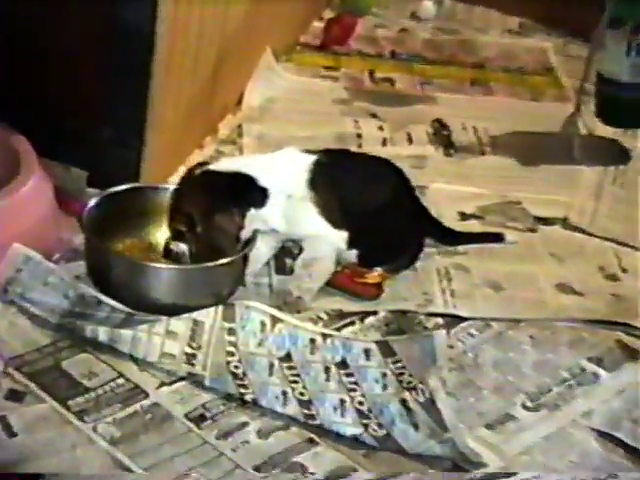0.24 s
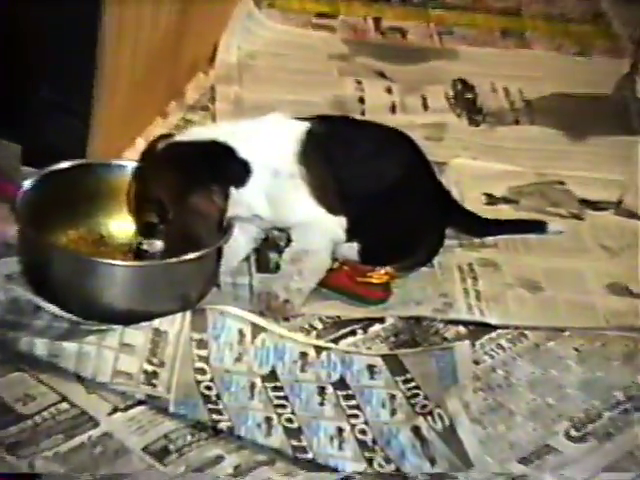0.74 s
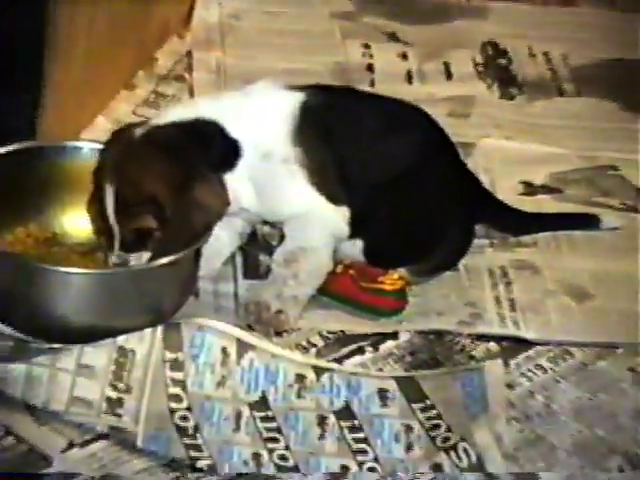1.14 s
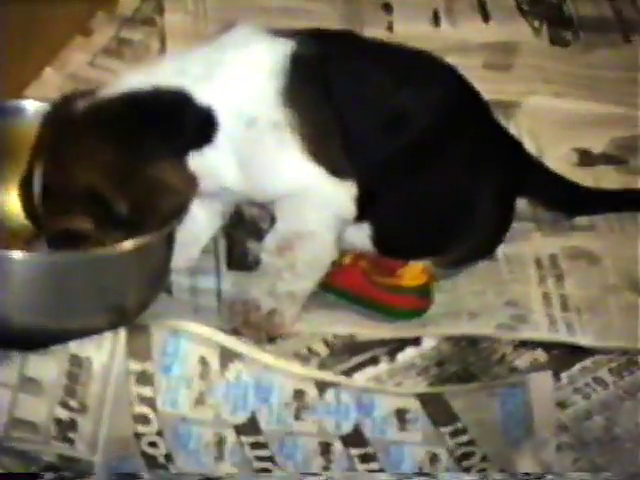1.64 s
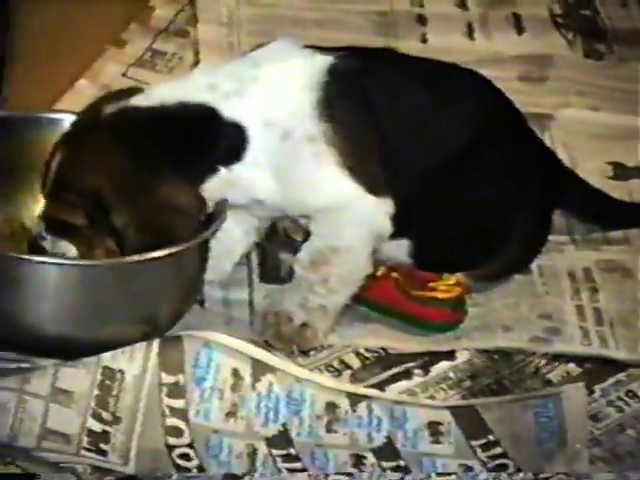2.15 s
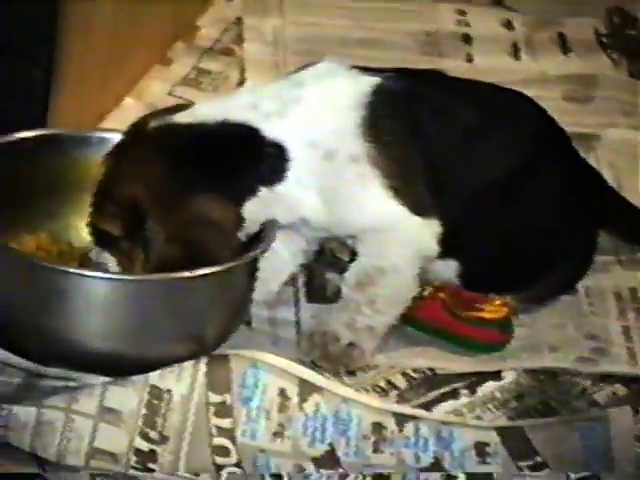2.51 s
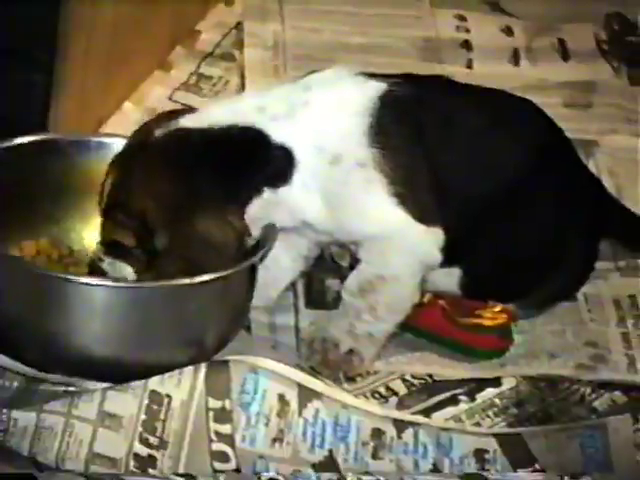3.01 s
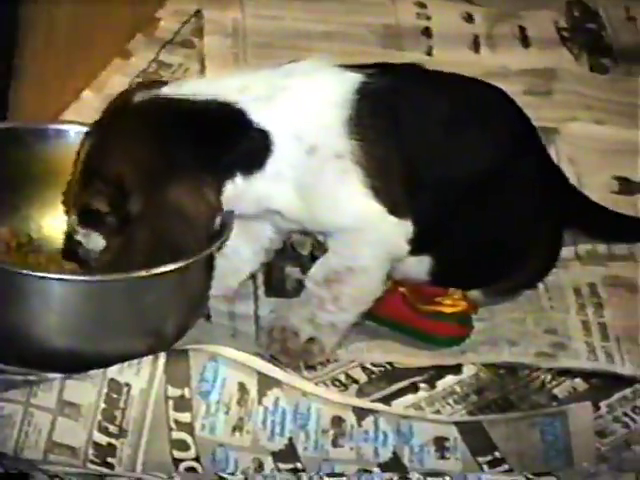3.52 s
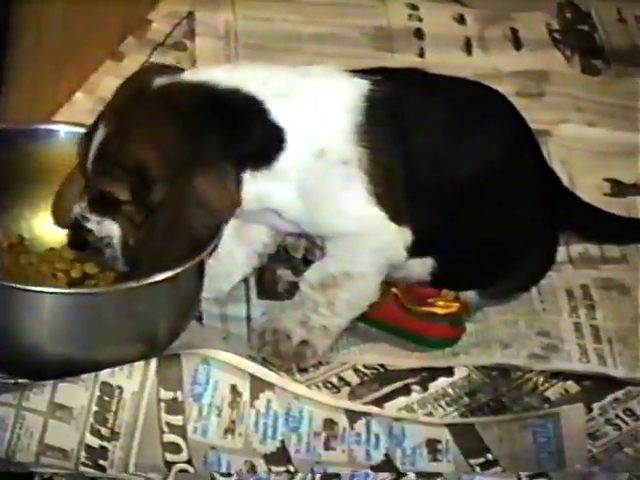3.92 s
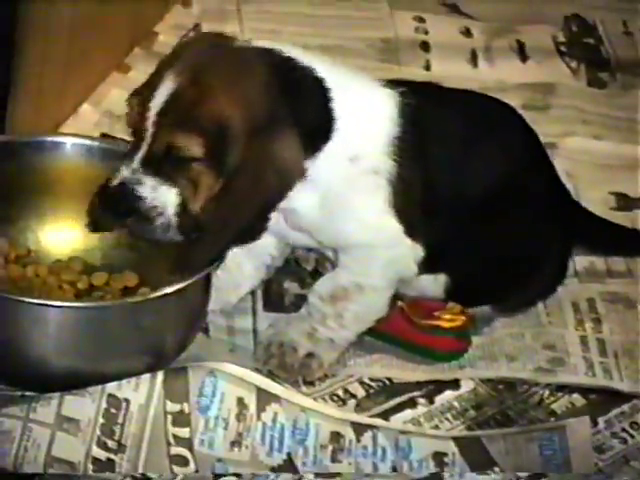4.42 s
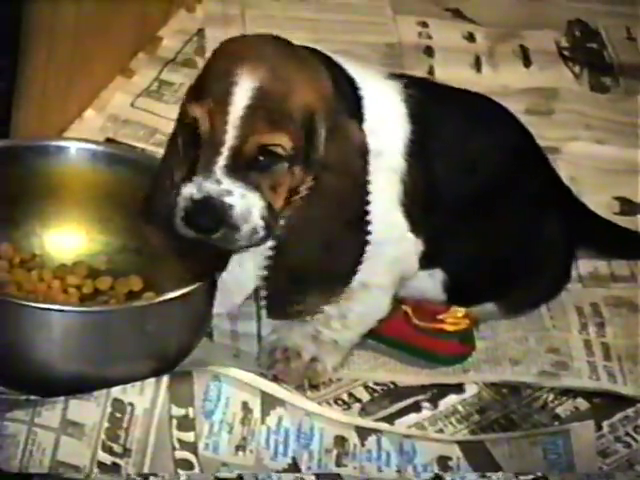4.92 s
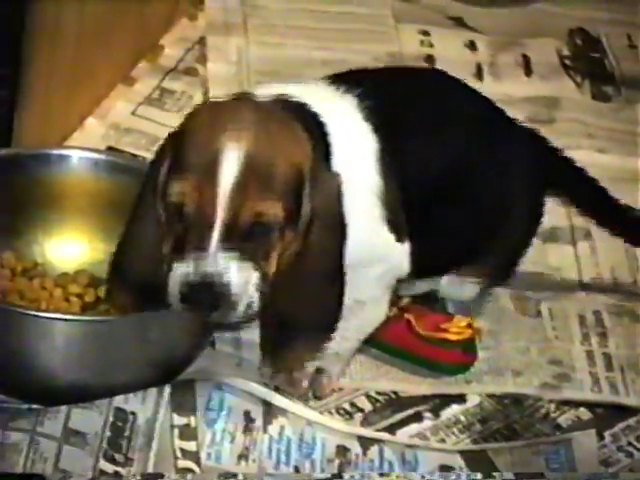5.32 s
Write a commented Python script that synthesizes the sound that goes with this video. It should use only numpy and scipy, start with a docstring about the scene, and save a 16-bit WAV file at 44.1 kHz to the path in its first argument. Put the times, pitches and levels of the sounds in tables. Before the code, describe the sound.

Puppies whimper and squeak indoors, one crying loudly again and again, with a brief newspaper rustle and steady hiss.

```python
"""A litter of puppies whines in a small hard-walled room, over house rumble, motor hum, tape hiss and buzz.
Faint whimpers come first, then a pup whose cries sink in pitch, and thin squeaks through the nose.
At 1 s a loud pup joins with almost pure tones that fall at their ends; the room rings after each cry.
From 2 s paws rustle on newspaper, and soon the loud cries close with a low croak. The camera's gain
control turns the rumble down along with the loud cries, while the hiss and buzz stay steady."""
import sys
import numpy as np
from scipy import signal
from scipy.fft import rfft, irfft, next_fast_len
from scipy.io import wavfile
from scipy.ndimage import uniform_filter1d

SR = 44100
rng = np.random.default_rng(int(sys.argv[2]) if len(sys.argv) > 2 else 0)


def waveform_to_disk(signal):
    """Save audio, clipped to [-1, 1], as 16-bit WAV at the path in sys.argv[1]."""
    frames = np.transpose(np.atleast_2d(signal))
    scaled = np.clip(frames, -1, 1) * 32767
    samples = np.round(scaled).astype(np.int16)
    wavfile.write(sys.argv[1], SR, samples)


N = 244973

# Levels are before the gain control. Harmonic k is a tone at k times the pitch; the 1st is the main tone.
# tone colour of the house rumble: f/Hz, relative level/dB
RUMBLE_COLOUR = [(15, -64), (25, -28.5), (113, -3.5), (421, -3), (567, -2), (644, -8.5), (763, -7),
                 (814, -5), (1190, -3.5), (1330, -6), (4000, -39), (5200, -80), (8800, -120)]
# level of the low hum over time: t/s, level/dB
HUM_LEVELS = [(0.0, -68), (1.3, -59.5), (2.1, -55.5), (2.5, -71), (2.7, -55.5), (3.85, -53.5), (4.0, -67.5),
              (4.2, -57), (4.9, -61), (5.55, -57)]
# tone colour of the tape hiss: f/Hz, relative level/dB
HISS_COLOUR = [(1470, -21.5), (2500, -3), (4310, -7), (4410, -5), (7780, -4), (9220, -2), (14300, -8),
               (15600, -6)]
# strength of the odd-numbered buzz tones: f/Hz, level/dB
BUZZ_LEVELS = [(3800, -76), (5000, -73), (7400, -71), (9400, -71), (11000, -73), (13000, -79), (15300, -79)]
# short whimpers: t/s, length/s, first f/Hz, last f/Hz, level/dB
WHIMPER_GLIDES = [(0.01, 0.052, 1100, 1110, -45), (0.225, 0.059, 558, 555, -40),
                  (0.286, 0.052, 1430, 1280, -45.5), (0.668, 0.035, 1417, 964, -36.5),
                  (1.37, 0.028, 1465, 1475, -41.5), (2.925, 0.17, 596, 549, -35.5),
                  (3.097, 0.098, 717, 646, -38), (3.778, 0.035, 1176, 1150, -34.5),
                  (3.821, 0.045, 1113, 962, -21.5), (3.945, 0.042, 558, 626, -40),
                  (4.059, 0.04, 521, 537, -37.5), (4.139, 0.08, 820, 708, -39),
                  (5.149, 0.041, 976, 836, -24.5)]
# how the mouth shapes the 3rd harmonic: f/Hz, level against the main tone/dB
MOUTH_THIRD = [(1900, -16.5), (2500, -12.5), (3000, -22.5), (3500, -27), (4500, -26)]
# the same for harmonics 4 to 7: f/Hz, level against the main tone/dB
MOUTH_UPPER = [(1500, -46), (2800, -57), (3500, -34.5), (4300, -53), (5000, -55), (5800, -50.5),
               (6500, -59), (8000, -78)]
# the sinking pup's cries: t/s, lead-in/s, sink time/s, length/s, first f/Hz, turning f/Hz, low f/Hz,
# four times level/dB (start to end), first and last overtone strength/dB, 3rd harmonic boost/dB
SINKING_CRIES = [(0.26, 0.018, 0.151, 0.23, 809, 782, 754.6, -24.5, -28.5, -27.5, -21.5, -23, -24.5, -8),
                 (0.802, 0.056, 0.045, 0.13, 808, 845, 682, -29.5, -28.5, -27, -27, -25, -16.5, 1),
                 (1.232, 0.051, 0.038, 0.21, 1014, 1085, 753, -25, -23.5, -23.5, -35.5, -26.5, -37, 4),
                 (1.601, 0.042, 0.05, 0.23, 1081, 1148, 715, -19.5, -22, -24, -32, -32.5, -12.5, -1),
                 (2.121, 0.0708, 0.045, 0.155, 1122, 1079, 1022, -23.5, -28, -18.5, -12, -22, -34, 9),
                 (2.518, 0.085, 0.06, 0.27, 1075, 1113, 687.7, -35.5, -25.5, -22.5, -26.5, -19, -26, 6),
                 (3.092, 0.05, 0.091, 0.31, 852.6, 890, 705, -28.5, -26, -23.5, -26.5, -28.5, -16, -2.5),
                 (4.575, 0.016, 0.013, 0.21, 785, 777, 718, -40, -28, -30.5, -34, -15, -11, -0.5)]
# squeaks through the nose: t/s, rough peak level/dB, f/Hz
NOSE_SQUEAKS = [(0.668, -50, 5650), (0.8834, -46, 3670), (1.1816, -56, 5500), (1.34, -52, 5600),
                (1.393, -51, 5220), (1.553, -52, 5870), (1.732, -50, 3750), (1.94, -51, 6200),
                (2.106, -53, 6105), (2.532, -48, 6080), (2.573, -51, 5780), (2.64, -58, 5220),
                (2.782, -47.5, 5570), (2.9248, -51.5, 5620), (3.024, -50, 6180), (3.677, -50, 5050),
                (3.7893, -38, 3370), (3.8681, -51.5, 5590), (3.926, -50, 5650), (4.52, -47, 5640),
                (4.797, -55, 5110), (5.52, -48, 5780)]
# the loud pup's cries: t/s, f/Hz, level/dB, overtone strength/dB (2nd harmonic against the main tone)
LOUD_CRIES = [
    [(0.985, 1522, -44, -35), (1.019, 1555, -34.5, -24), (1.119, 1445, -45, -43), (1.151, 1328, -37, -25),
     (1.165, 1056, -26.5, -21), (1.19, 1071, -67, -24)],
    [(1.41, 1450, -46, -18), (1.472, 1535, -36.5, -44), (1.6, 1415, -41, -14), (1.634, 1332, -25.5, -48),
     (1.65, 1157, -16.5, -43), (1.68, 924, -18, -38)],
    [(1.868, 1188, -15.5, -18), (1.884, 1246, -32, -23), (1.922, 1312, -22.5, -30),
     (1.968, 1174, -25, -14.5), (2.018, 1089, -25.5, -21.5), (2.126, 1009, -33.5, -4),
     (2.15, 998.7, -21, -19), (2.198, 994.5, -19, -18.5), (2.254, 1009, -19, -27), (2.27, 1030, -44.5, 7),
     (2.28, 959, -18, -27), (2.31, 737, -34.5, -42)],
    [(2.484, 1265, -23, -37), (2.51, 1254, -19.5, -32), (2.52, 1300, -26, -38.5), (2.528, 1424, -33, -31),
     (2.55, 1340, -29, -36), (2.625, 1320, -27.5, -27), (2.655, 1235, -31, -28), (2.67, 1158, -29.5, -23),
     (2.72, 1091, -17.5, -33), (2.75, 958, -22.5, -27), (2.768, 741, -20, -30.5), (2.785, 707, -38, -1.5)],
    [(2.945, 1148, -27, -20.5), (2.989, 1206, -21, -26), (3.001, 1257, -26.5, -27), (3.053, 1165, -19, -25),
     (3.117, 1162, -14, -28.5), (3.171, 1041, -15.5, -31), (3.199, 818, -16.5, -44.5),
     (3.215, 567, -41, -10.5)],
    [(3.413, 1205, -15, -36), (3.431, 1197, -11, -41), (3.469, 1226, -10.5, -49),
     (3.503, 1207, -11.5, -32.5), (3.513, 1187, -13, -41), (3.522, 1236, -18, -36), (3.57, 1220, -36, -10),
     (3.59, 1132, -18, -20), (3.631, 1077, -17, -25.5), (3.712, 944.4, -14, -48),
     (3.737, 750, -21.5, -31.5), (3.752, 600, -26, -20)],
    [(3.935, 1172, -20, -40), (3.945, 1213, -11, -33), (4.045, 1196, -8.5, -35), (4.062, 1110, -16.5, -42),
     (4.072, 1092, -16.5, -30), (4.099, 1066, -17.5, -48), (4.153, 1053, -15.5, -33.5),
     (4.172, 1028, -21.5, -26.5), (4.204, 1005, -14.5, -22.5), (4.288, 1026, -17, -16),
     (4.328, 1024, -9.5, -33.5), (4.338, 962, -14, -26.5), (4.363, 611, -26.5, -9.5)],
    [(4.542, 1104, -23, -32), (4.598, 1177, -16, -49.5), (4.684, 1097, -16, -34.5),
     (4.696, 1141, -13.5, -36), (4.724, 1109, -21, -31), (4.748, 1104, -9.5, -40), (4.774, 1063, -15, -25),
     (4.83, 999, -12.5, -23.5), (4.85, 848, -16, -39), (4.878, 587, -33, 12.5)],
    [(5.063, 996, -29, -15), (5.093, 1066, -15.5, -33), (5.145, 1098, -17, -28), (5.269, 1008, -14.5, -30),
     (5.298, 987, -30, -4.5), (5.31, 967, -18.5, -21), (5.35, 945, -15.5, -24),
     (5.412, 789.2, -16.5, -30.5), (5.48, 794.5, -23.5, -23), (5.5, 763, -21, -10.5),
     (5.525, 555, -37, -21.5)],
]
# for each loud cry: 3rd harmonic boost/dB
LOUD_BOOSTS = [7, 8, -1, 2.5, 3, -7, 0, -4, -3.5]
# paw steps: t/s, crackle level/dB, time to fade by 60 dB/s, thud level/dB
PAW_STEPS = [(2.149, -28, 0.019, -53), (2.461, -37.5, 0.13, -47.5), (2.51, -41, 0.58, -63),
             (3.808, -56, 0.17, -40)]
# tone colour of newspaper: f/Hz, relative level/dB
PAPER_COLOUR = [(300, -16.5), (1200, 7.5), (2500, -18.5), (4000, -11.5), (5300, -12), (6500, -22.5),
                (8000, -29.5)]
# croaks that close the falling cries: t/s, peak level/dB
CLOSING_CROAKS = [(2.772, -38), (3.205, -31), (3.742, -24), (4.355, -33), (4.868, -20.5), (5.515, -33.5)]


def from_db(db):
    """Turns a level in dB into a number to multiply by."""
    return 10 ** (np.asarray(db) / 20)


def rms_one(x):
    """Scales a sound to an average strength (rms) of 1."""
    return x / np.sqrt(np.mean(x ** 2) + 1e-20)


def at_hz(points, hz):
    """Looks up a level between a table's frequencies, on an octave scale."""
    return np.interp(np.log(hz), np.log(np.array(points)[:, 0]), np.array(points)[:, 1])


def drift(rate_hz):
    """A random wander of size about 1: noise smoothed twice."""
    r = np.exp(-2 * np.pi * rate_hz / SR)
    return rms_one(signal.lfilter([1], [1, -2 * r, r * r], rng.standard_normal(N + 9000))[9000:])


def coloured_noise(colour):
    """Noise of strength 1 with the given tone colour."""
    hz = np.maximum(np.fft.rfftfreq(N, 1 / SR), 1)
    return rms_one(irfft(rfft(rng.standard_normal(N)) * from_db(at_hz(colour, hz)), N))


def tones(pairs, scatter_turns=0.11):
    """Steady pure tones from (f/Hz, level/dB) pairs, loosely in step."""
    t = np.arange(N) / SR
    return sum(np.sqrt(2) * from_db(db) * np.sin(2 * np.pi * (hz * t + scatter_turns * rng.normal()))
               for hz, db in pairs)


def house_rumble(level_db=-44.5):
    """Broad, low noise whose level wanders a little."""
    return from_db(level_db + 2.1 * drift(5.9)) * coloured_noise(RUMBLE_COLOUR)


def motor_hum(hz=126.2):
    """A low hum and its octave, with a level that varies over time."""
    db = np.interp(np.arange(N) / SR, *np.transpose(HUM_LEVELS)) + 1.5 * drift(9.0) + 1.5 * drift(2.2)
    return from_db(db) * tones([(hz, 0), (2 * hz, -5.5)])


def tape_noise(hiss_db=-51, buzz_hz=4 * 59.94, whistle_hz=15734.3):
    """Tape hiss, buzz leaking from the picture signal, and the high line-scan whistle."""
    harmonics = np.arange(16, 64)
    hz = harmonics * buzz_hz
    db = at_hz(BUZZ_LEVELS, hz) - 4 * (harmonics % 2 == 0)   # even ones are weaker
    return from_db(hiss_db) * coloured_noise(HISS_COLOUR) + tones([*zip(hz, db), (whistle_hz, -67)])


def overtone_levels(pitch, db, strength_db, boost_db):
    """Levels of harmonics 2 to 7; the overtone strength sets the 2nd and also lifts the 3rd."""
    third = db + 0.55 * strength_db + boost_db + at_hz(MOUTH_THIRD, 3 * pitch)
    upper = [db + 0.54 * boost_db + at_hz(MOUTH_UPPER, k * pitch) for k in range(4, 8)]
    return [db + strength_db, third, *upper]


def voice(cries, shaky=1, jitter=0.0045, shimmer_db=0.6, breath_db=-22):
    """Sings rows of t/s, f/Hz, level/dB; extra strength and boost columns add hoarse overtones."""
    out = np.zeros(N)
    wobble = 1 + shaky * jitter * (drift(9.9) + drift(30.0)) / np.sqrt(2)
    tremble = from_db(shaky * shimmer_db * drift(64.0)) + from_db(breath_db) * drift(170.0)
    flicker, rasp = from_db(2.5 * drift(8.7)), drift(150.0)
    for cry in cries:
        times, hz, *columns = np.transpose(cry)
        span = np.arange(round(times[0] * SR), min(round(times[-1] * SR), N))
        t = span / SR
        pitch = np.interp(t, times, hz)
        phase = 2 * np.pi * np.cumsum(pitch * wobble[span]) / SR
        db, *extras = [np.interp(t, times, column) for column in columns]
        tone = from_db(db) * np.sin(phase) * tremble[span]
        octaves_per_s = np.gradient(uniform_filter1d(np.log2(pitch), size=400)) * SR
        hoarse = np.clip(0.3 - 0.08 * octaves_per_s, 0.3, 1)   # a falling pitch is rougher
        for k, overtone_db in enumerate(overtone_levels(pitch, db, *extras) if extras else [], 2):
            shifted = (span + 7001 * k) % N   # each overtone flickers in its own time
            roughness = np.sqrt(1 - 0.9 * hoarse ** 2) + hoarse * rasp[shifted]
            tone += from_db(overtone_db) * np.sin(k * phase) * flicker[shifted] * roughness
        fades = np.clip(np.minimum((t - t[0]) / 0.0055, (t[-1] - t) / 0.0028), 0, 1)
        out[span] += np.sqrt(2) * tone * fades
    return out


def whimpers():
    """Rows for voice(): short, straight slides in pitch at one level."""
    return [[(start, first_hz, db), (start + length, last_hz, db)]
            for start, length, first_hz, last_hz, db in WHIMPER_GLIDES]


def room(x, fade_s=0.39, echo_db=-15, wall_cut_hz=3280, ring_hz=1075, ring_db=0.1):
    """Echoes bounce between the walls, duller each time, and one note of the room rings on."""
    size = next_fast_len(N + SR)
    hz = np.fft.rfftfreq(size, 1 / SR)
    walls = 1 + 1j * hz / wall_cut_hz
    echoes = 0
    for k, lag_s in enumerate([.0113, .0149, .0177, .0211, .0243, .0289, .0317, .0361, .0409, .0453]):
        bounce = from_db(-60 * lag_s / fade_s) / walls * np.exp(-2j * np.pi * hz * lag_s)
        echoes += (-1) ** k * bounce / (1 - bounce)   # all its repeats added up
    r, angle = from_db(-60 / (fade_s * SR)), 2 * np.pi * ring_hz / SR
    ring = (1 - r * r) / 2 * signal.lfilter([1, 0, -1], [1, -2 * r * np.cos(angle), r * r], x + 1e-18)
    return from_db(echo_db) * irfft(rfft(x, size) * echoes, size)[:N] + from_db(ring_db) * ring


def sinking_pup(sharpness=1.5, fade_s=0.015, fade_db=-17):
    """Each cry slides to a turning point, then relaxes towards a lower pitch."""
    cries = []
    for start, lead, sink, length, first_hz, turn_hz, low_hz, *levels in SINKING_CRIES:
        *loudness, first_strength, last_strength, boost_db = levels
        age = np.linspace(0, length, 80)
        held_hz = np.interp(age, [0, lead], [first_hz, turn_hz])
        hz = low_hz + (held_hz - low_hz) * np.exp(-(np.maximum(age - lead, 0) / sink) ** sharpness)
        db = np.interp(age, np.sort([0, lead, lead + sink, length]), loudness)
        db += fade_db * np.maximum(1 - (length - age) / fade_s, 0)
        strength_db = np.linspace(first_strength, last_strength, 80)
        cries.append(np.transpose([start + age, hz, db, strength_db, np.full(80, boost_db)]))
    return voice(cries, shaky=1.62)


def nose_squeaks(length_s=0.055, fall=0.06, rasp_depth=0.6):
    """Brief, breathy whistles through the nose that waver and fall a little."""
    out, waver = np.zeros(N), 0.012 * drift(60.0)
    rasp = (1 + rasp_depth * drift(150.0)) / (1 + 2 * rasp_depth)   # peaks near 1
    for time, db, hz in NOSE_SQUEAKS:
        start = time - 0.01
        span = np.arange(round(start * SR), min(round((start + length_s) * SR), N))
        pitch = hz * (1 + waver[span] - fall * np.linspace(-0.5, 0.5, len(span)))
        swell = from_db(db) * np.hanning(len(span)) * rasp[span]
        out[span] += swell * np.sin(2 * np.pi * np.cumsum(pitch) / SR)
    return out


def loud_pup():
    """The steadiest voice: almost pure cries that drop in pitch at their ends."""
    return voice([[(*row, boost_db) for row in cry] for cry, boost_db in zip(LOUD_CRIES, LOUD_BOOSTS)])


def gain_control(x, limit_db=-22, slope=0.68, recover_db_per_s=4.5, react_s=0.038, lift_db=7.5):
    """Lifts quiet sound, turns down quickly past the limit and comes back slowly."""
    level_db = 10 * np.log10(uniform_filter1d(x ** 2, size=2048) + 1e-9)
    ramp = recover_db_per_s * np.arange(N) / SR
    held_db = np.maximum.accumulate(level_db + ramp) - ramp
    r = np.exp(-1 / (react_s * SR))
    excess_db = signal.lfilter([1 - r], [1, -r], np.maximum(held_db - limit_db, 0))
    return from_db(lift_db - slope * excess_db) * x


def paws_on_paper(rise_s=0.003):
    """Newspaper crackles and dies away over the soft thud of a paw."""
    crackle = coloured_noise(PAPER_COLOUR) * from_db(1.5 * drift(100.0))
    low_band = signal.butter(3, [80, 400], "band", fs=SR, output="sos")
    thud = rms_one(signal.sosfilt(low_band, rng.standard_normal(N)))
    out, t = np.zeros(N), np.arange(N) / SR
    for start, crackle_db, fade_s, thud_db in PAW_STEPS:
        age = np.maximum(t - start, 0)
        shape = np.minimum(age / rise_s, 1) * from_db(-60 * age / fade_s)
        out += shape * (from_db(crackle_db) * crackle + from_db(thud_db) * thud)
    return out


def croaks(hz=566.6, length_s=0.017):
    """Rows for voice(): tiny low notes that swell and fade on one pitch."""
    return [[(start, hz, db - 2), (start + length_s / 2, hz, db), (start + length_s, hz, db - 2)]
            for start, db in CLOSING_CROAKS]


def scene():
    """The litter in its room; the smaller voices are shakier."""
    pups = loud_pup() + sinking_pup() + voice(whimpers() + croaks(), shaky=3.5)
    litter = pups + nose_squeaks() + paws_on_paper()
    return (litter + room(litter) + house_rumble() + motor_hum())[None]


def record(dry, cutoff_hz=15750):
    """Gain control, then tape noise, then a steep cut of the highest treble."""
    taped = gain_control(dry[0]) + tape_noise()
    return signal.sosfilt(signal.ellip(16, 0.5, 80, cutoff_hz, fs=SR, output="sos"), taped)[None]


dry = scene()
out = record(dry)
waveform_to_disk(out)
```